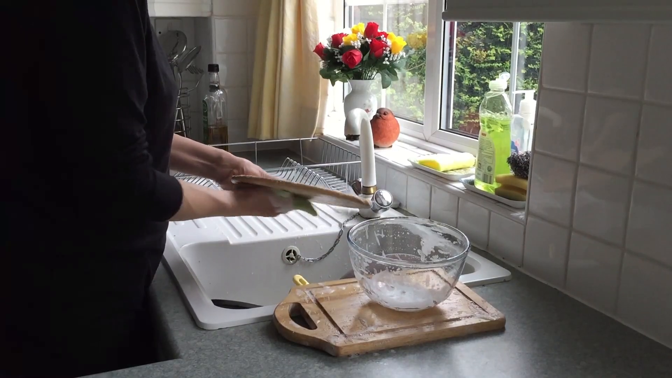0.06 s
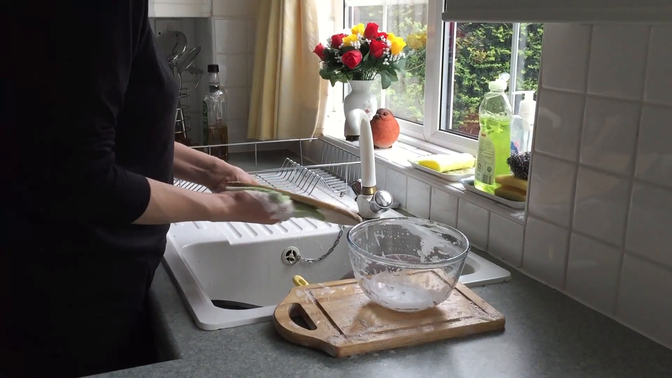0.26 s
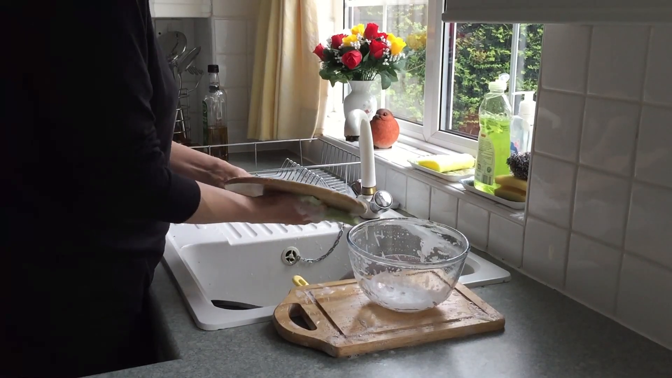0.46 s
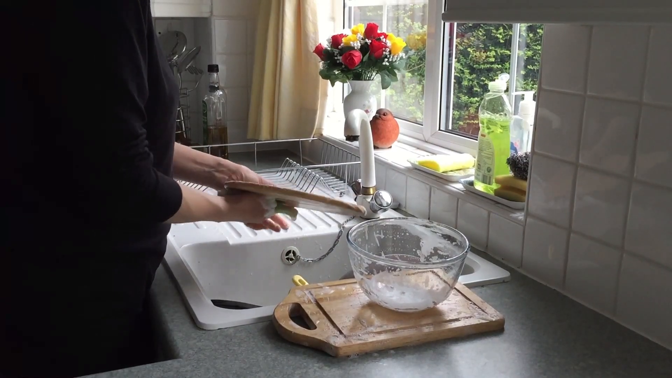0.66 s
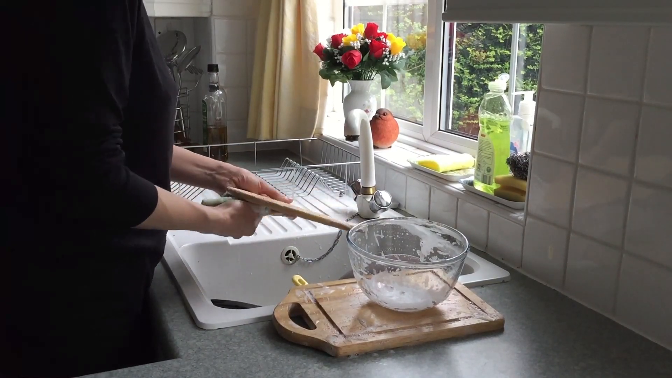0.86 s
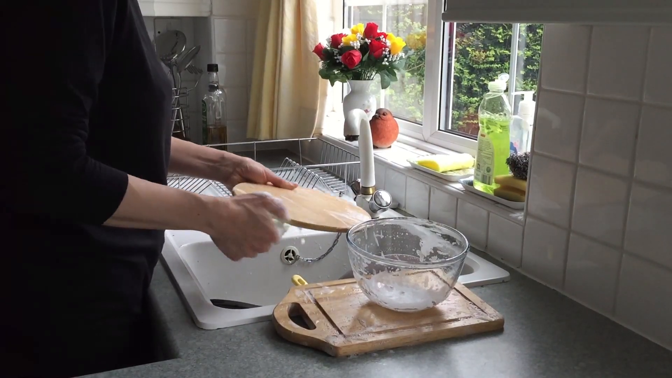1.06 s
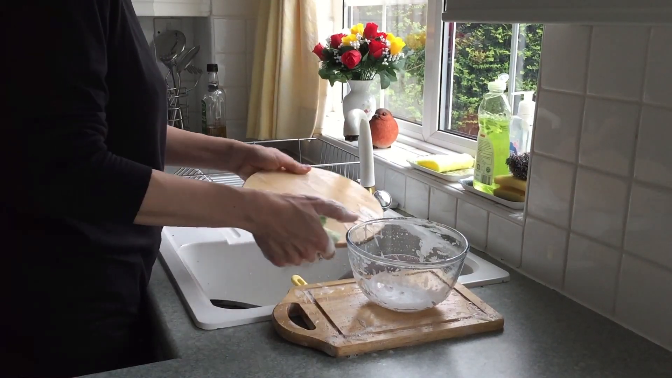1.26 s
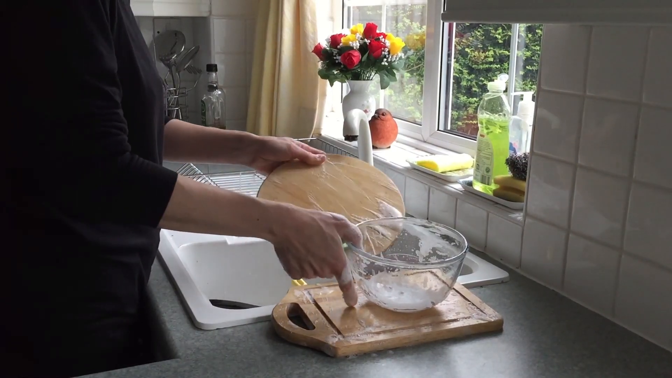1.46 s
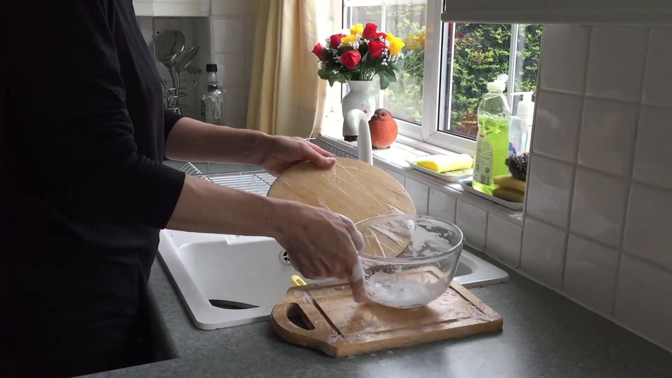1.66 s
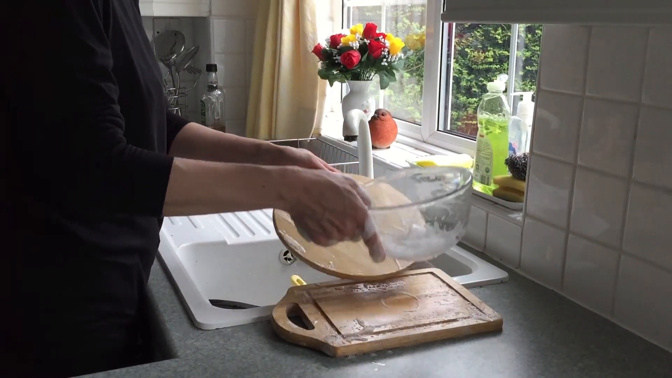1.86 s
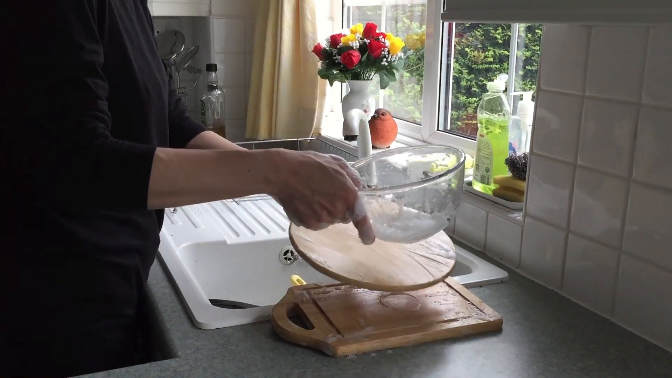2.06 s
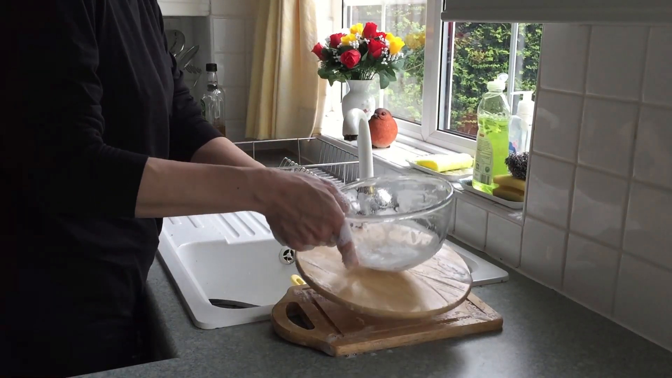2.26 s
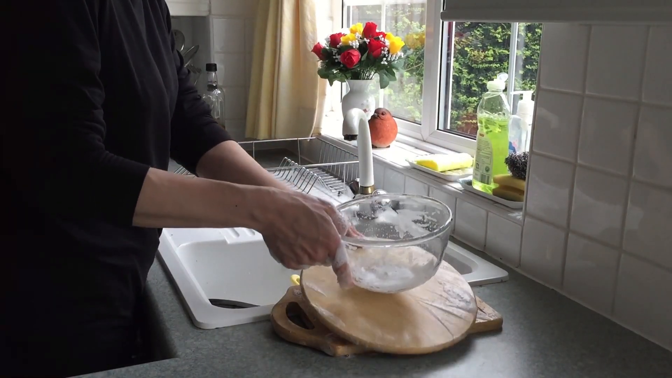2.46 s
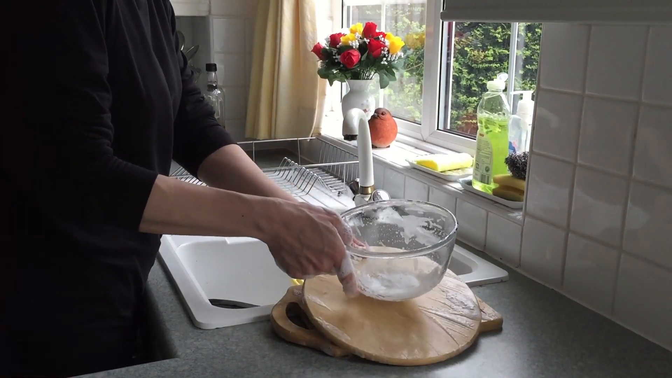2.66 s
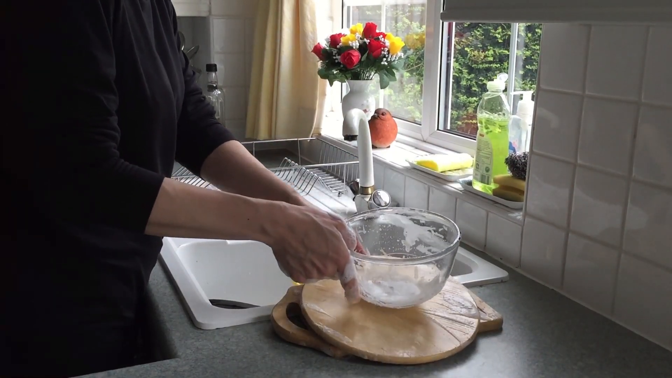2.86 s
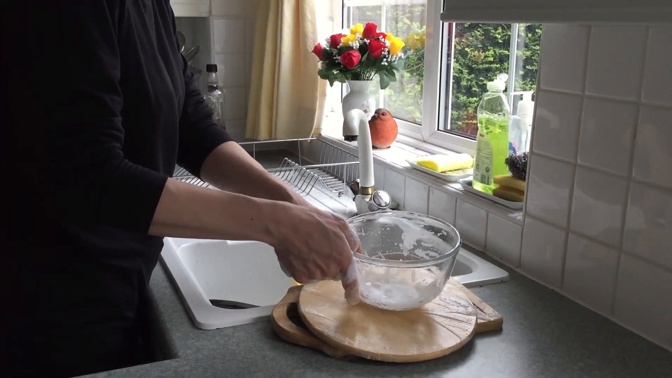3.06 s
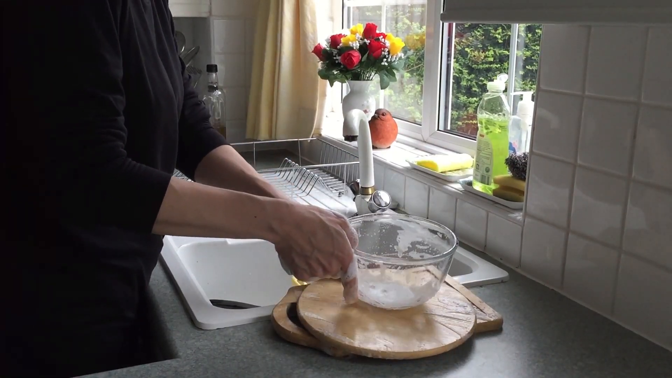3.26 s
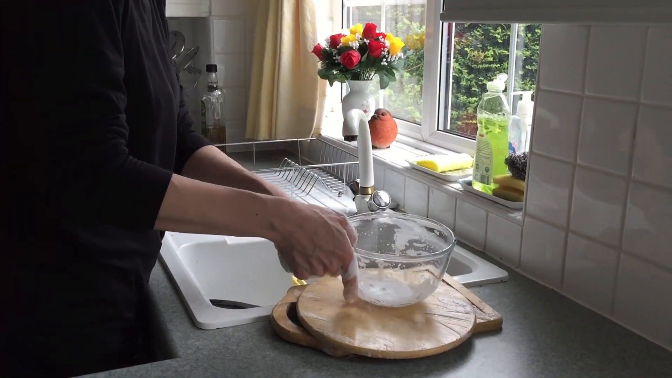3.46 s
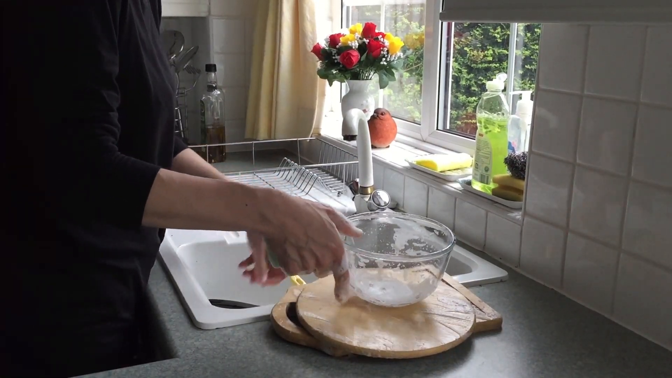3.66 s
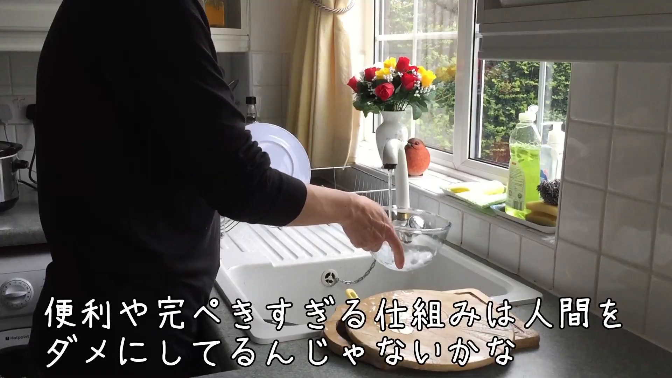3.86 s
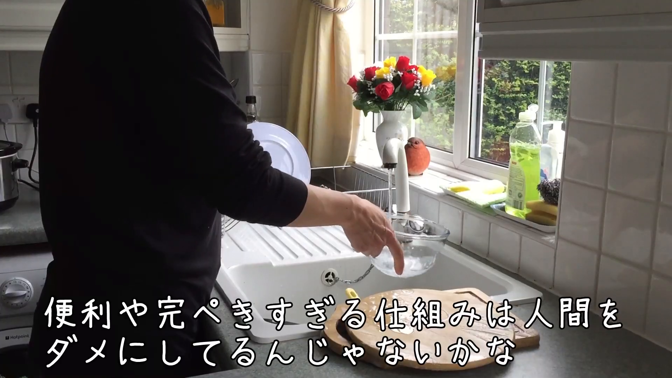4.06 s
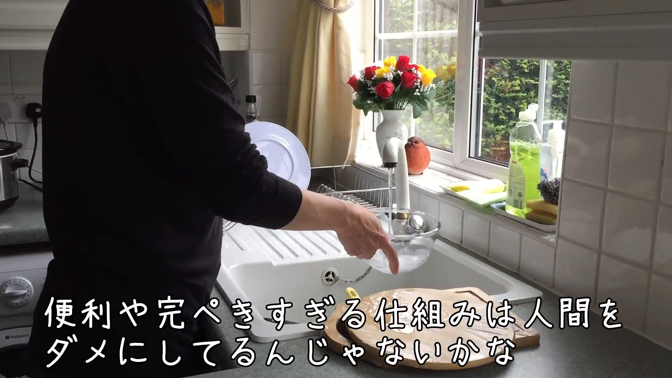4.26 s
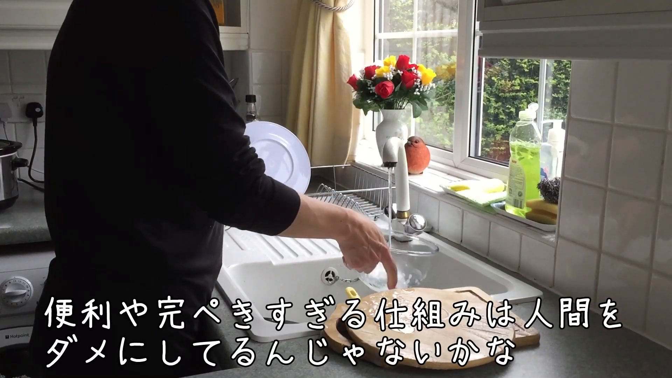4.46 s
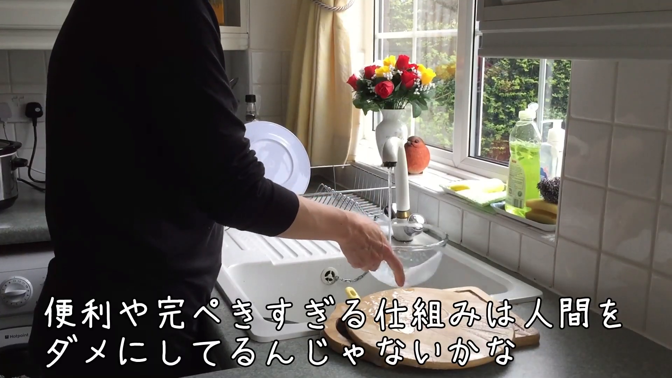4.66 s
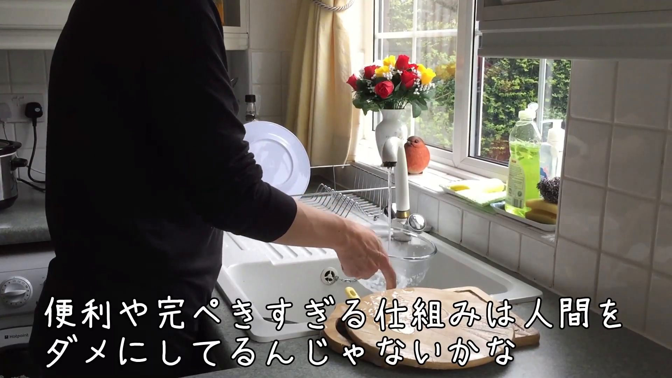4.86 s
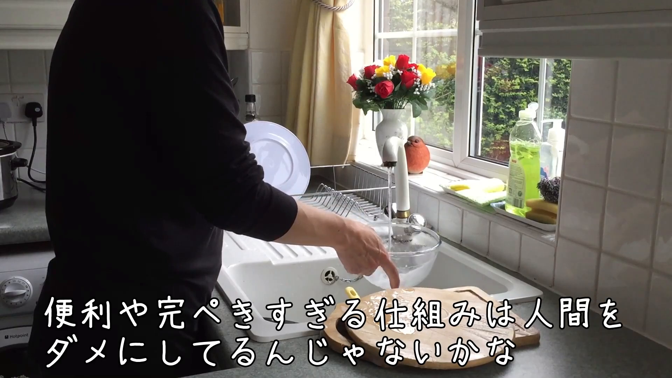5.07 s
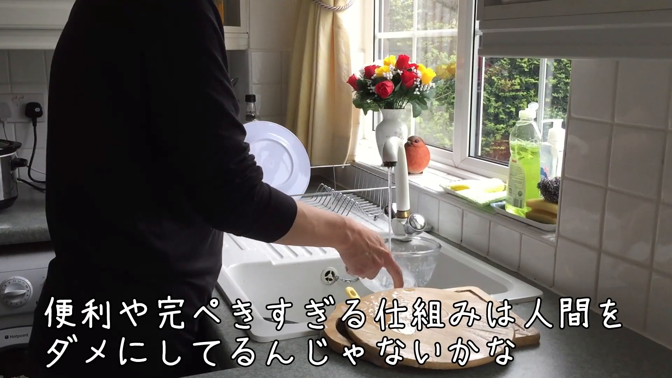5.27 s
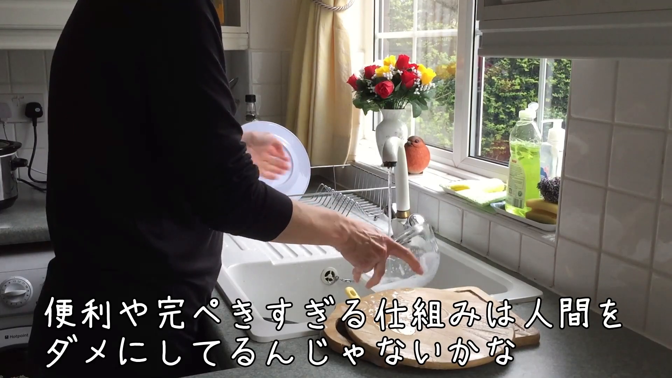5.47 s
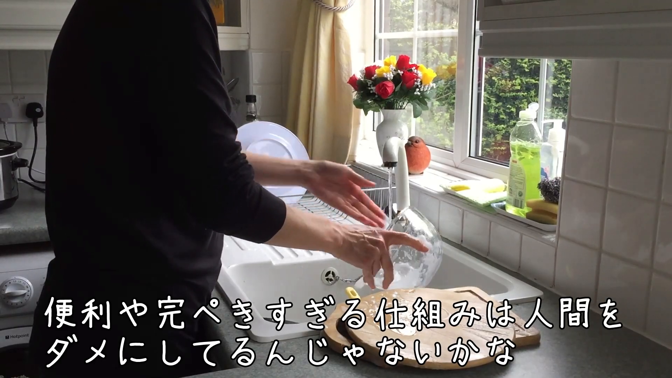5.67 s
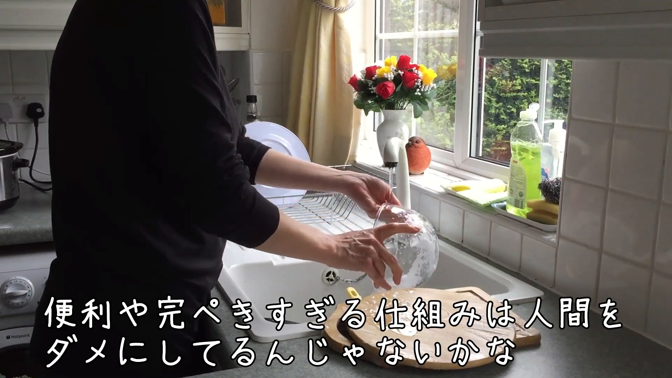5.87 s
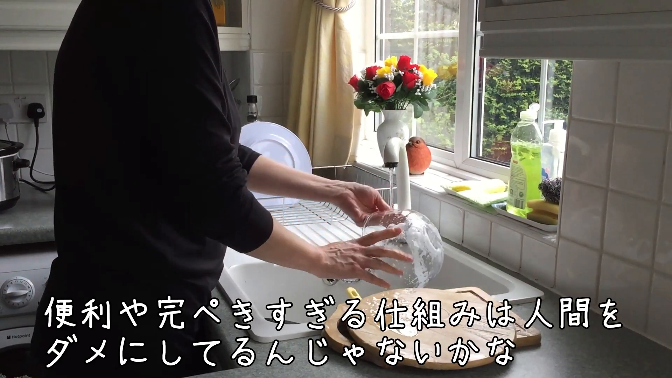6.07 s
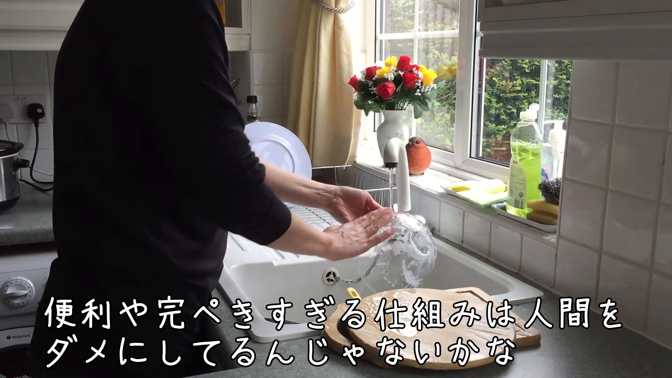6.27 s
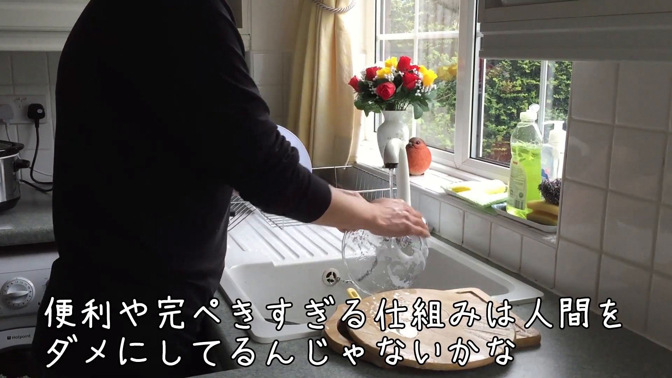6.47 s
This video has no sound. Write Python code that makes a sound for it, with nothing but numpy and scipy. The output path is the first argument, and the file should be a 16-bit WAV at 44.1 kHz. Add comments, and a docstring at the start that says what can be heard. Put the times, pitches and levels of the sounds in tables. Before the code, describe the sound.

A close, single-channel pickup in a small reflective tiled kitchen, over low room noise and a very faint appliance hum. From 0 to about 1.2 s a wet sponge rubs a wooden platter in soft, squeaky-hissy strokes that fade, with two tiny drips near 1.0 s. At 1.57-1.67 s a glass bowl rattles against the platter in a quick run of clinks, with one stronger ringing knock at 1.8 s. Platter and bowl land on a chopping board: a light touch at 2.5 s, a very loud hollow clack with counter thud at 2.65 s, further knocks to 2.85 s, and a dry one at 3.37 s. The background ducks and recovers. From 4.2 to 4.9 s water slops into the sink in short splashes, strongest around 4.65 s. From 5 s to the end at about 6.5 s, runoff patters in spurts, gurgling around 6.1-6.3 s, among bright rising drop plinks.

```python
"""A glass bowl and a wet wooden platter knock together and land on a chopping board in a tiled kitchen:
each knock is a burst of noise plus fading tones. Before that a sponge wipes the platter, made of tiny bubble rings.
Then the bowl is tipped out into the sink: splashes and running water are noise and bubble clouds,
and drops are rising tones. Room noise and an appliance hum lie beneath.
A limiter ducks everything after each loud knock and lets it swell back."""
import sys
import numpy as np
from scipy import signal
from scipy.fft import rfft, irfft, next_fast_len
from scipy.io import wavfile
from scipy.ndimage import uniform_filter1d, map_coordinates

SR = 44100
rng = np.random.default_rng(int(sys.argv[2]) if len(sys.argv) > 2 else 0)


def log_audio(samples):
    """Write samples as a 16-bit WAV file to the path given in sys.argv[1]."""
    # one column per channel
    frames = np.atleast_2d(samples).T
    # limit to full scale, then quantise
    limited = np.clip(frames, -1, 1)
    pcm = np.round(limited * 32767).astype(np.int16)
    wavfile.write(sys.argv[1], SR, pcm)


N = 287532  # length of the scene in samples

# slops of water landing in the sink:
# (time [s], spray level before trim [dB], length [s], tilt [dB per octave], basin boom before trim [dB])
SPLASH_EVENTS = [(4.241, -28.5, 0.024, 1, -36), (4.377, -22, 0.023, 2, -40),
                 (4.488, -23.5, 0.031, -1.6, -33.5), (4.639, -12, 0.025, -1.8, -28),
                 (4.705, -14, 0.068, 2, -20), (4.869, -36, 0.1, -1.5, -38.5), (6.128, -44, 0.12, -9, -35.5)]
# water running off the tilted bowl, levels before trim:
# (time [s], length [s], patter level [dB], gurgle level [dB], fine spray level [dB])
POUR_EVENTS = [(5.067, .06, -27, -50, -33.5), (5.384, 0.178, -20.5, -52, -38),
               (5.842, 0.031, -28.5, -50, -41), (6.017, 0.25, -17, -20, -34.5)]
DRIP_FROM_S = 4.95  # the emptied bowl starts to drip


def knocks():
    """Bowl and platter clink in the hands, then land on the board, where each blow also thuds into the counter."""
    # the bowl knocks against the platter in mid-air:
    # (time [s], clack level [dB], hardness [Hz], bowl ring level [dB], platter level [dB])
    clinks = [(1.5706, -12.5, 2380, -12.5, -22), (1.583, 2.5, 5200, -13, -21), (1.595, 4, 3700, -9.5, -14),
              (1.611, -10, 2600, -18, -22), (1.630, -12, 2200, -25.5, -16), (1.655, -7.5, 2580, -14.5, -32),
              (1.671, -7.5, 2200, -18, -33), (1.7878, 7.5, 3540, -7, 5.5)]
    # platter and bowl come down on the board:
    # (time [s], clack level [dB], hardness [Hz], platter pitch [Hz], platter level [dB], platter t60 [s])
    landings = [ (2.471, -24.5, 2350, 976, -5, 0.052), (2.6442, 12, 3300, 925, 15, 0.047),
                (2.650, 9.5, 3800, 743.5, -0.5, .19), (2.688, -0.5, 2370, 827, 7, 0.061),
                (2.790, 1, 1890, 983, 6, 0.029), (2.843, 3, 1930, 1016, 13, 0.046),
                (3.106, -16, 2700, 796, -24, .1), (3.366, 1.5, 1790, 925, 11, 0.015), ]
    # the counter's thud: (frequency [Hz], level [dB])
    counter_spectrum = [(40, -25), (85, -1.5), (125, -6.5), (165, 3.5), (230, -16.5), (340, -9.5),
                        (600, -30), (1200, -67)]
    held_hz, held_t60_s = 921, .245  # the platter's ring while it is held by the rim
    thud_db, shake_db = -16.5, -32  # counter thud and bowl ring of a landing, relative to its clack
    graze_s, graze_db = 0.0078, -25  # an edge touches this long before each landing, relative to its clack

    out = np.zeros(N)
    t = np.arange(int(.7 * SR)) / SR
    for s, clack_db, hard_hz, bowl_db, platter_db in clinks:
        add(out, s, knock(clack_db, hard_hz, held_hz, platter_db, held_t60_s, bowl_db))
    for s, clack_db, hard_hz, pitch_hz, platter_db, t60 in landings:
        thud = coloured(rng.standard_normal(len(t)), counter_spectrum)
        thud *= amp(clack_db + thud_db - 60 * t / 0.34) * (1 - np.exp(-t / 0.0059))
        touch_db = clack_db + graze_db
        graze = knock(touch_db, hard_hz, pitch_hz, touch_db, t60, touch_db + shake_db)
        add(out, s - graze_s, graze)
        blow = knock(clack_db, hard_hz, pitch_hz, platter_db, t60, clack_db + shake_db)
        add(out, s, blow + thud)
    return out


def knock(clack_db, hard_hz, pitch_hz, platter_db, platter_t60, bowl_db):
    """One contact gives a short noisy clack and sets the platter and the bowl ringing."""
    # the clack of wood: (frequency [Hz], level [dB])
    wood_spectrum = [(60, -33), (200, -3.5), (450, 0.5), (800, -0.5), (1500, 4), (1950, 0.5), (2400, 1),
                     (4300, -5.5), (5300, -4.5), (8000, -3), (16000, 6)]
    # ways the platter rings: (ratio to its pitch, level [dB], share of its t60)
    platter_modes = [(.275, -11.5, 1.45), (.95, -13, .6), (1, 0, 1), (1.11, -19, .7), (3.2, -30, .18)]
    # ways the glass bowl rings, damped by the hand:
    # (frequency [Hz], level before a random change at each knock [dB], t60 [s])
    bowl_modes = [(180, -12, .4), (226, -5, .25), (252, 2, .38), (578, -14, .34), (735, -4, .28),
                  (845, -10, .3), (1113, -6, .4), (1380, -4, .2), (1512, -10, .35), (1759, -4, .18),
                  (1872, -10, .22), (2217, -10, .22), (3791, -12, .11), (4400, -10, .15), (5790, -20, .16),
                  (9200, -28, .1)]
    t = np.arange(int(.7 * SR)) / SR

    def ring(hz, t60):
        """A pure tone that dies away by 60 dB in t60 seconds."""
        return amp(-60 * t / t60) * np.sin(2 * np.pi * hz * t)

    def contact(hz):
        """A softer contact (lower hard_hz) leaves out the treble."""
        return amp(along(wood_spectrum, hz)) / np.sqrt(1 + (hz / hard_hz) ** 7.9)

    clack = unit(filtered(rng.standard_normal(len(t)), contact)) * amp(clack_db - 60 * t / 0.028)
    platter = np.zeros(len(t))
    for ratio, db, share in platter_modes:
        platter += amp(platter_db + db) * ring(ratio * pitch_hz, share * platter_t60)
    bowl = np.zeros(len(t))
    for hz, db, t60 in bowl_modes:
        gain = amp(bowl_db + db + rng.uniform(-2.9, 1.5))
        bowl += gain * rng.choice([-1, 1]) * ring(hz, t60)
    press = 1 - np.exp(-(t / 0.00082) ** 2)  # the force builds up as the wood gives
    return in_room(press * clack, wet_db=-1.5) + in_room(press * platter, wet_db=-5.0) + press * bowl


def sponge():
    """Strokes on wet wood over a fading slide; the foam crackles less as it is wiped away."""
    # sponge strokes, levels before trim: (time [s], length [s], rub level [dB], wet hiss level [dB])
    strokes = [(-0.01, 0.039, -31, -28), (0.182, 0.12, -31, -36), (0.428, 0.034, -30, -36),
               (0.468, 0.061, -31.5, -27), (0.762, 0.024, -36, -58), (0.92, 0.044, -37.5, -53)]
    # rubbed wood: (frequency [Hz], level [dB])
    rub_spectrum = [(260, -67), (450, -25.5), (541, -12), (630, -16), (709, -10.5), (1230, -3.5),
                    (1390, -7), (1780, -1.5), (3570, 4.5), (6000, -8), (7800, -39), (13200, -120)]
    # wet foam: (frequency [Hz], level [dB])
    foam_spectrum = [(2350, -55), (4000, -4), (4870, -11.5), (5440, -9), (8910, -8), (15100, -13),
                     (16000, -27)]
    attack_s, release_s = .022, .3  # rise time and t60 of a stroke
    rest_rub_db, rest_hiss_db = -36.5, -33.5  # sliding between strokes, at first, before trim
    rub_fade, hiss_fade = 3.5, 8.5  # [dB per s]
    touch_s, lift_release_s = 1.167, 0.4  # how long the sponge stays on the platter, t60 as it leaves

    t = np.arange(N) / SR
    touching = envelope(-attack_s, touch_s, attack_s, lift_release_s)
    rub_gain = touching * amp(rest_rub_db - rub_fade * t)
    hiss_gain = touching * amp(rest_hiss_db - hiss_fade * t)
    for s, length, rub_db, hiss_db in strokes:
        stroke = envelope(s, length, attack_s, release_s)
        rub_gain = np.hypot(rub_gain, amp(rub_db) * stroke)
        hiss_gain = np.hypot(hiss_gain, amp(hiss_db) * stroke)
    rub = bubbles(N, rate=2500, centre_hz=2025, spread=0.74, cycles=8.5, scatter_db=1.0)
    rub = coloured(rub, rub_spectrum)
    foam = bubbles(N, rate=4000, centre_hz=7860, spread=0.65, cycles=1, scatter_db=-2.0)
    foam = coloured(foam, foam_spectrum)
    return in_room(amp(-3.0) * rub_gain * rub + amp(-5.0) * hiss_gain * foam, wet_db=-4.5)


def splashes():
    """Slops of water burst into spray, bubbles and snapping droplets, and drum on the basin."""
    # water spray: (frequency [Hz], level [dB])
    spray_spectrum = [(200, -11.5), (400, -6.5), (570, 0.5), (850, -1), (1100, -3.5), (1450, -8),
                      (1900, -7), (2330, 1), (2800, -9), (3700, -8.5), (5200, -14.5), (8000, -14),
                      (12500, -12), (16000, -32)]
    # the drumming basin: (frequency [Hz], level [dB])
    basin_spectrum = [(26, -42), (45, -4), (102, 6), (146, 1), (210, 1), (242, -4), (303, -3.5), (362, -36),
                      (420, -16), (550, -35), (920, -120)]
    swell_share = 0.18  # time constant of a slop's build-up, as a share of its length

    out = np.zeros(N)
    t = np.arange(int(.6 * SR)) / SR
    for s, db, length, tilt_db, boom_db in SPLASH_EVENTS:
        swell = 1 - np.exp(-t / (swell_share * length))
        after = np.maximum(t - length, 0)
        fizz = bubbles(len(t), rate=2200, centre_hz=3800, spread=.85, cycles=8, scatter_db=4)
        # single droplets snapping on the basin
        crackle = bubbles(len(t), rate=260, centre_hz=6560, spread=0.74, cycles=1.9, scatter_db=5)
        hiss = amp(-7) * rng.standard_normal(len(t))
        spray = coloured(fizz + amp(-1.5) * crackle + hiss, spray_spectrum, tilt_db)
        spray *= amp(-60 * after / 0.079)
        boom = coloured(rng.standard_normal(len(t)), basin_spectrum) * amp(-60 * after / 0.26)
        slop = swell * (amp(db - 3.5) * clumped(spray, depth_db=2.5) + amp(boom_db - 2.5) * boom)
        add(out, s, in_room(in_sink(slop), wet_db=-1.5))
    return out


def in_sink(x):
    """The basin's hard walls throw back quick copies that colour every splash alike."""
    # echoes: (delay [s], level [dB])
    sink_walls = [(.0011, -11), (.0024, -8), (.0043, -7.5), (.0069, -6), (0.0105, -0.5), (0.0154, -6)]
    out = x.copy()
    for delay, db in sink_walls:
        add(out, delay, amp(db) * x)
    return out


def drops():
    """The big drops, each with its own answer from the tiles."""
    # (time [s], level [dB], nominal bubble pitch [Hz], relative pitch spread of the cluster)
    big_drops = [ (1.019, -28.5, 1825, .03), (1.063, -33, 2820, .03), (5.014, -26.5, 4300, 0.029),
                 (5.095, -14.5, 7090, 0.18), (5.096, -20, 1515, 0.1), (5.150, -30, 1665, .07),
                 (5.260, -27, 1774, .03), (5.287, -31, 1950, .03), (5.361, -26, 3900, .04),
                 (5.386, -22, 3530, 0.062), (5.408, -20.5, 1018, .1), (5.420, -15.5, 3880, .14),
                 (5.520, -23.5, 672, .07), (5.534, -15, 1680, 0.083), (5.540, -17, 2890, 0.11),
                 (5.562, -25, 1755, 0.064), (5.600, -12, 1900, .25), (5.652, -22.5, 2470, 0.37),
                 (5.715, -17.5, 1833, .42), (5.865, -17, 5900, 0.167), (5.874, -28.5, 850, 0.035),
                 (5.988, -22, 2620, 0.49), (6.016, -16.5, 3000, .38), (6.072, -13.5, 2590, 0.46),
                 (6.118, -19, 1156, 0.21), (6.228, -19.5, 631, 0.14), (6.285, -25.5, 646, 0.064),
                 (6.412, -25.5, 9500, 0.18), (6.445, -13.5, 6260, 0.075), ]
    out = np.zeros(N)
    for s, db, bubble_hz, spread in big_drops:
        add(out, s, in_room(amp(db) * drop(bubble_hz, spread), wet_db=-0.5))
    return out


def drop(bubble_hz, spread):
    """A drop traps a small cluster of bubbles; each rings and rises in pitch as it nears the surface."""
    t = np.arange(int(.4 * SR)) / SR
    t60 = .045 * (1479 / bubble_hz) ** .7  # a 1479 Hz bubble rings for 0.045 s, higher ones die sooner
    cluster = np.zeros(len(t))
    sizes = [0, *rng.permutation([-1.18, -0.59, 0.506, 0.83])]
    for k, size in enumerate(sizes):
        pitch = bubble_hz * np.exp(1.363 * spread * size) * (.96 + 0.23 * np.minimum(t / t60, 1))
        plink = np.sin(2 * np.pi * np.cumsum(pitch) / SR)
        plink *= amp(-60 * t / t60) * (1 - np.exp(-t / 0.000077))
        delay = k * t60 * 0.083 * rng.uniform(0.506, 1)
        add(cluster, delay, amp(-3 * k) * plink)  # later bubbles are weaker
    return cluster


def trickle():
    """Water runs off the bowl: droplets patter and fine spray ticks first, then big bubbles gurgle."""
    # big bubbles: (frequency [Hz], level [dB])
    gurgle_spectrum = [(150, -45), (350, -4), (540, -8), (643, 2), (845, -11), (1140, -12), (1400, -14),
                       (1820, -48), (3080, -120)]
    # droplets: (frequency [Hz], level [dB])
    patter_spectrum = [(590, -28), (1000, -7), (1490, -16), (1710, -6.5), (2000, -22), (2200, -9),
                       (4020, 0), (7000, 0), (9100, -46), (15400, -120)]
    # fine spray: (frequency [Hz], level [dB])
    mist_spectrum = [(2940, 1), (5000, -12.5), (9650, -0.5), (10500, -5.5), (12600, 0), (16000, -11)]
    attack_s, release_s = 0.02, 0.1  # rise time and t60 of a pour
    # the thick of the stream lands after the first droplets, and lasts beyond them
    lag_s, hold_s = 0.078, 0.0086
    dribble_db, mist_db = -43.5, -46  # patter and fine spray between the pours, before trim

    dripping = np.arange(N) / SR > DRIP_FROM_S
    patter_gain = amp(dribble_db) * dripping
    spray_gain = amp(mist_db) * dripping
    gurgle_gain = np.zeros(N)
    for s, length, patter_db, gurgle_db, spray_db in POUR_EVENTS:
        flow = envelope(s, length, attack_s, release_s)
        stream = envelope(s + lag_s, length - lag_s + hold_s, attack_s, release_s)
        patter_gain = np.hypot(patter_gain, amp(patter_db) * flow)
        spray_gain = np.hypot(spray_gain, amp(spray_db) * flow)
        gurgle_gain = np.hypot(gurgle_gain, amp(gurgle_db) * stream)
    gurgle = bubbles(N, rate=420, centre_hz=798, spread=0.41, cycles=9.4, scatter_db=4.0)
    gurgle = coloured(gurgle, gurgle_spectrum)
    patter = bubbles(N, rate=750, centre_hz=2500, spread=.5, cycles=18, scatter_db=3.5)
    patter = coloured(patter, patter_spectrum)
    spray = bubbles(N, rate=600, centre_hz=9000, spread=.35, cycles=22, scatter_db=4.5)
    spray = clumped(coloured(spray, mist_spectrum), depth_db=2.0)
    water = amp(-8) * gurgle_gain * gurgle
    water += amp(-9.5) * patter_gain * patter
    water += amp(-3.5) * spray_gain * spray
    return in_room(water, wet_db=-1.5)


def drips():
    """Smaller drops fall at random: a few all the time from the wet bowl, many during a pour or a splash."""
    # showers of drops: (time [s], length [s], drops per second, typical level [dB])
    showers = [(DRIP_FROM_S, N / SR - DRIP_FROM_S, 16, -37)]
    for s, length, patter_db, _, _ in POUR_EVENTS:
        showers.append((s, length, 45, patter_db - 7))
    for s, db, length, _, _ in SPLASH_EVENTS:
        showers.append((s + length / 2, length, 110, db - 4))

    out = np.zeros(N)
    for s, length, rate, db in showers:
        for k in range(round(rate * length)):
            size, pitch = np.clip(rng.standard_normal(2), -2, 2)
            plink = drop(2500 * np.exp(0.55 * pitch), spread=0.096)  # 2500 Hz is a typical small drop
            add(out, s + (k + rng.random()) / rate, amp(db + 2.5 * size) * plink)
    return in_room(out, wet_db=1.5)


def background():
    """Steady room noise and an appliance hum whose tones waver in phase."""
    # room noise: (frequency [Hz], level [dB])
    air_spectrum = [(20, -26), (45, -3.5), (65, 0), (120, -3.5), (165, -1), (220, -7), (300, -5),
                    (420, -14), (700, -13.5), (1000, -16.5), (2000, -18), (4000, -22), (9000, -27.5),
                    (16000, -32.5)]
    # the appliance: (frequency [Hz], level [dB])
    hum_tones = [(298, -48), (345, -55)]
    t = np.arange(N) / SR
    hum = np.zeros(N)
    for hz, db in hum_tones:
        hum += amp(db) * np.sin(2 * np.pi * hz * t + 0.54 * wobble(7.7))
    return amp(-41.5) * coloured(rng.standard_normal(N), air_spectrum) + hum


def in_room(x, wet_db):
    """x plus a fresh random tail from the tiles, whose pitches die away at different speeds."""
    # echo time of the kitchen: (frequency [Hz], t60 [s])
    kitchen_t60 = [(100, 0.28), (300, 0.57), (1000, 0.29), (3000, 0.33), (8000, 0.29), (15000, 0.21)]
    hz, t, z = signal.stft(rng.standard_normal(SR // 2), SR, nperseg=256)
    decay = amp(-60 * t / along(kitchen_t60, hz)[:, None])
    tail = signal.istft(z * decay, SR, nperseg=256)[1]
    # the nearest walls answer after a few ms
    tail = tail * (1 - np.exp(-(np.arange(len(tail)) / SR / 0.0011) ** 2))
    return x + amp(wet_db) * signal.fftconvolve(x, tail / np.linalg.norm(tail))[:len(x)]


def bubbles(length, rate, centre_hz, spread, cycles, scatter_db):
    """A cloud of tiny rising rings of unequal strength, rate a second, each 40 dB down after cycles; rms 1."""
    count = int(rate * length / SR) + 1
    when, size = rng.random((2, count))
    hz = np.clip(centre_hz * np.exp(spread * rng.standard_normal((count, 1))), 350, 15000)
    steps = np.arange(400)  # samples in one ring
    turns = hz * steps / SR
    age = np.minimum(turns / cycles, 2)
    strength = amp(-scatter_db * np.log(np.maximum(size, .02)))[:, None]
    rings = strength * amp(-40 * age) * np.sin(2 * np.pi * turns * (1 + .05 * age))
    at = (when * length).astype(int)[:, None] + steps
    return unit(np.bincount(at.ravel(), rings.ravel(), length)[:length])


def clumped(x, depth_db):
    """Droplets land in bunches, so their level flutters."""
    return x * unit(amp(depth_db * wobble(55)))[:len(x)]


def envelope(s, length, attack, release):
    """Rise from time s over attack, start to die away at s + length with a t60 of release."""
    t = np.arange(N) / SR - s
    return np.clip(t / attack, 0, 1) * amp(-60 * np.maximum(t - length, 0) / release)


def wobble(rate):
    """A smooth random curve, rate knots a second."""
    knots = rng.standard_normal(int(N * rate / SR) + 4)
    return map_coordinates(knots, [np.arange(N) * rate / SR])


def coloured(x, spectrum, tilt_db=0):
    """x with a spectrum, tilted per octave, at rms 1."""
    return unit(filtered(x, lambda hz: amp(along(spectrum, hz) + tilt_db * np.log2(hz + 1))))


def filtered(x, response):
    """x times a response of frequency."""
    m = next_fast_len(len(x) + 8192)  # spare room so the end does not wrap onto the start
    return irfft(rfft(x, m) * response(np.fft.rfftfreq(m, 1 / SR)), m)[:len(x)]


def along(points, hz):
    """Read between (frequency, value) points on a log frequency axis."""
    f, v = np.transpose(points)
    return np.interp(np.log(hz + 1), np.log(f + 1), v)


def add(track, s, sound):
    """Mix a sound in at time s."""
    part = track[max(0, round(s * SR)):][:len(sound)]
    part += sound[:len(part)]


def amp(db):
    """Decibels to gain."""
    return 10 ** (np.asarray(db) / 20)


def unit(x):
    """Scale to rms 1."""
    return x / np.sqrt(np.mean(x ** 2) + 1e-20)


def scene():
    """Everything as heard beside the sink."""
    return (knocks() + sponge() + splashes() + drops() + trickle() + drips() + background())[None]


def limiter(x, ceiling, release_db):
    """The gain drops within milliseconds on a loud sound and climbs back release_db a second."""
    level = np.sqrt(np.abs(uniform_filter1d(x * x, size=88)))  # rms over 2 ms
    over = 20 * np.log10(np.maximum(level / ceiling, 1))
    climb = release_db * np.arange(N) / SR
    cut = np.maximum.accumulate(over + climb) - climb
    return x * uniform_filter1d(amp(-cut), size=61)


def record(dry):
    """Limit loud sounds, round off the peaks that slip through, drop deep bass and the top treble."""
    x = limiter(dry[0], ceiling=0.64, release_db=17.5)
    x = x / (1 + np.abs(x) ** 12) ** (1 / 12)
    x = signal.sosfilt(signal.butter(4, 42, "highpass", fs=SR, output="sos"), x)
    return filtered(x, lambda hz: hz < 16000)[None]


dry = scene()
out = record(dry)
log_audio(out)
```